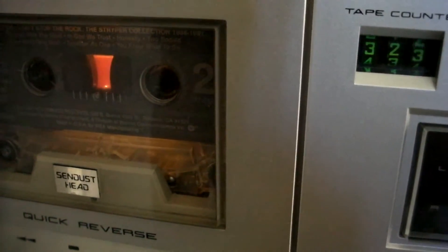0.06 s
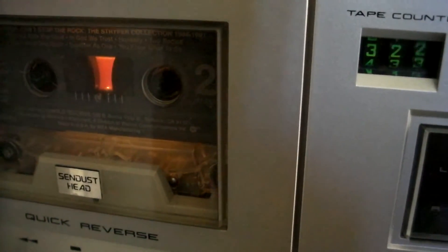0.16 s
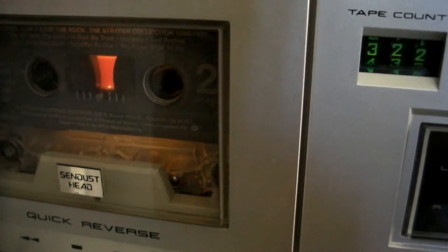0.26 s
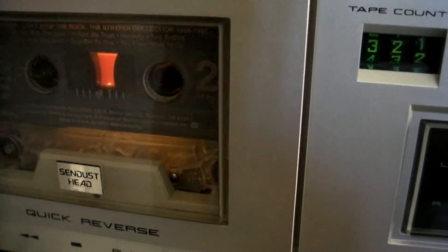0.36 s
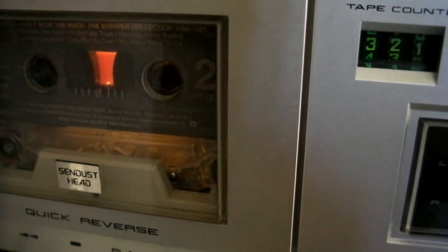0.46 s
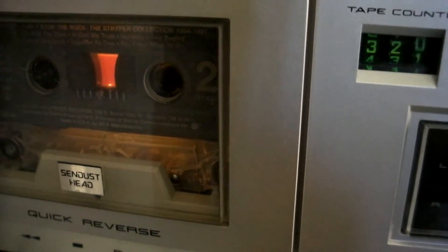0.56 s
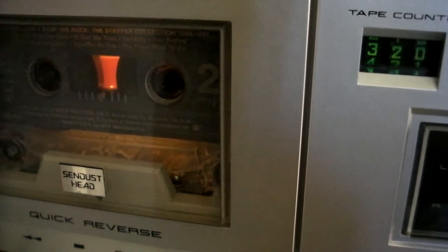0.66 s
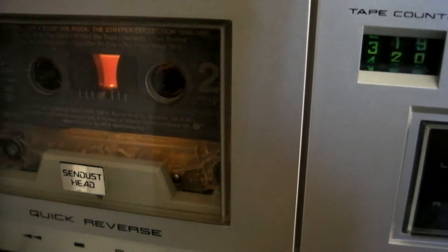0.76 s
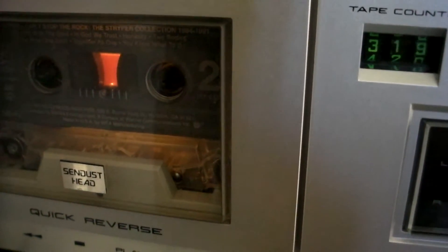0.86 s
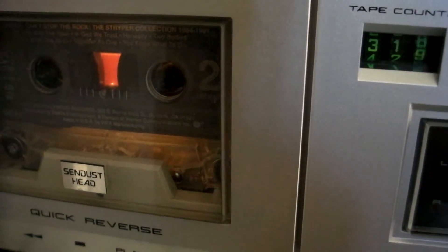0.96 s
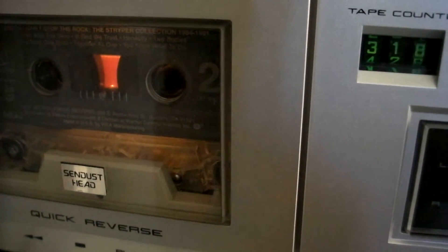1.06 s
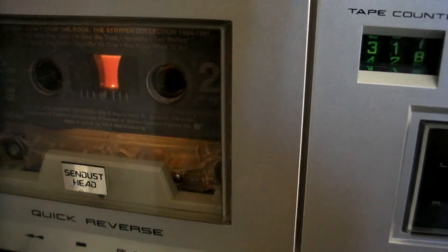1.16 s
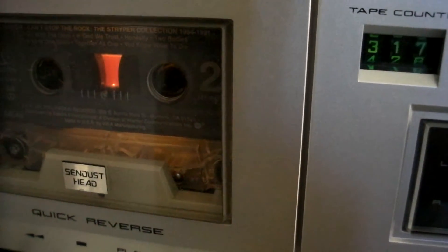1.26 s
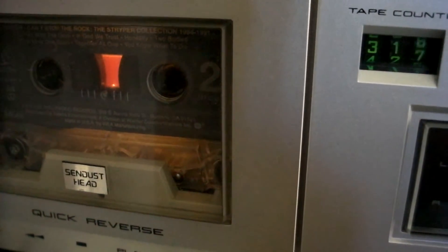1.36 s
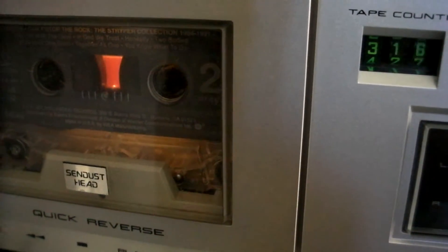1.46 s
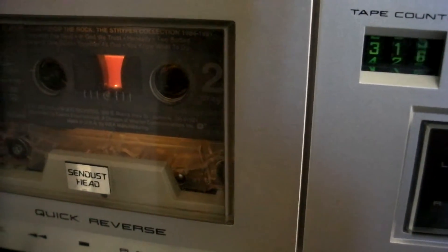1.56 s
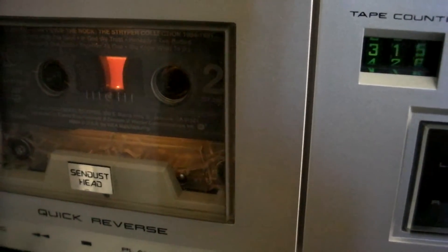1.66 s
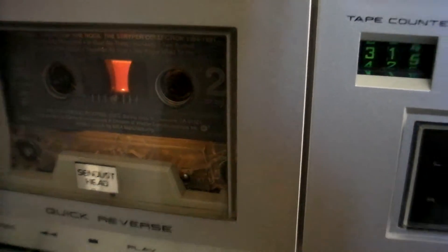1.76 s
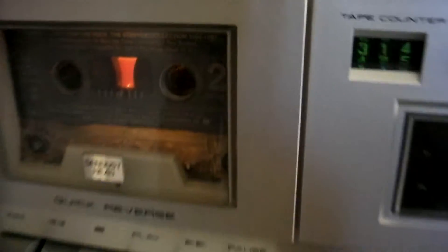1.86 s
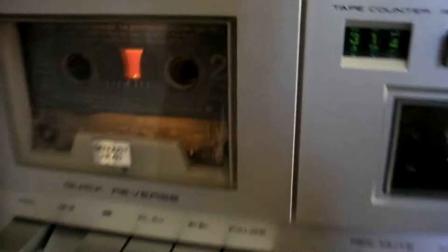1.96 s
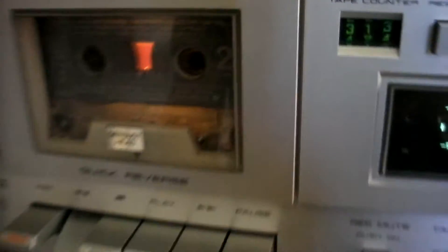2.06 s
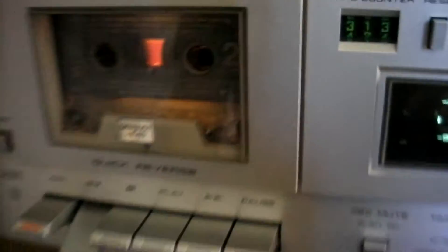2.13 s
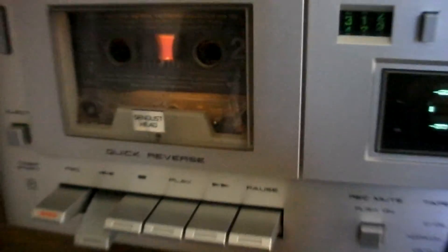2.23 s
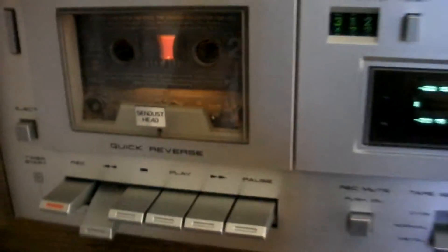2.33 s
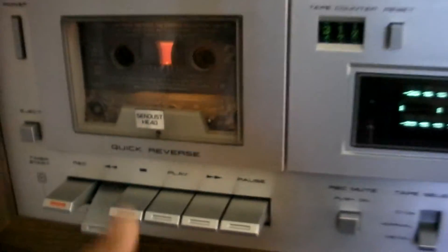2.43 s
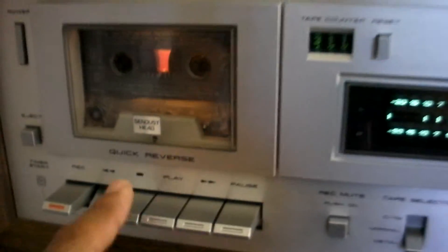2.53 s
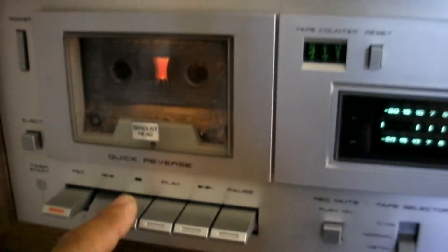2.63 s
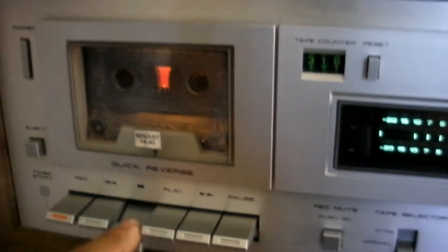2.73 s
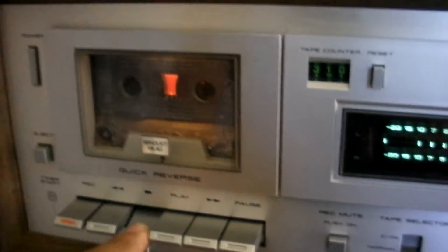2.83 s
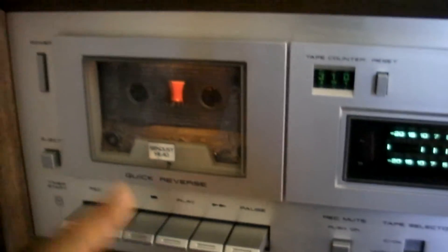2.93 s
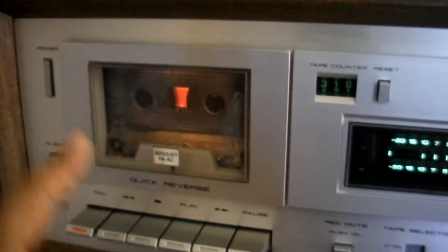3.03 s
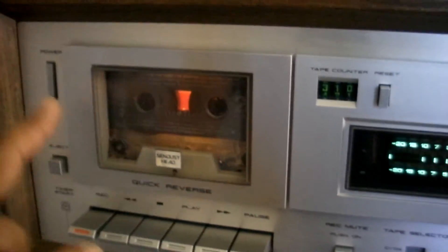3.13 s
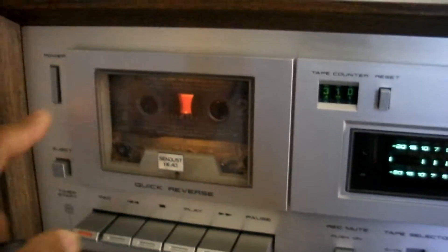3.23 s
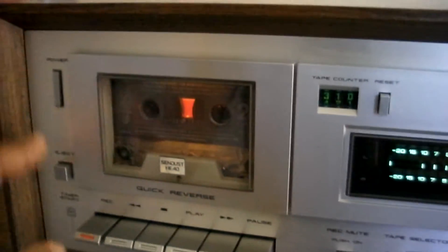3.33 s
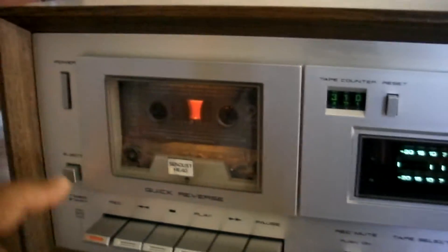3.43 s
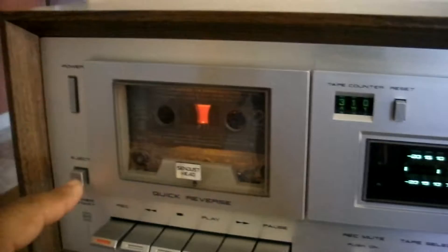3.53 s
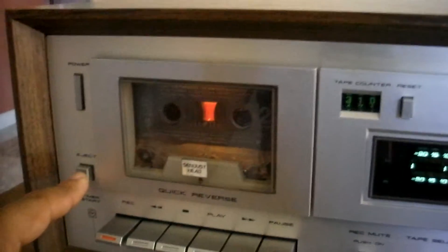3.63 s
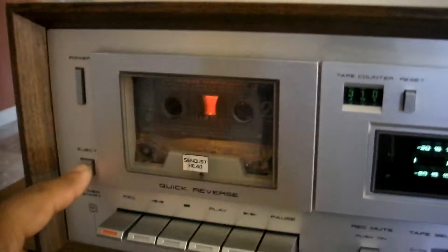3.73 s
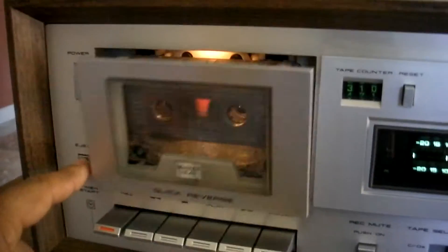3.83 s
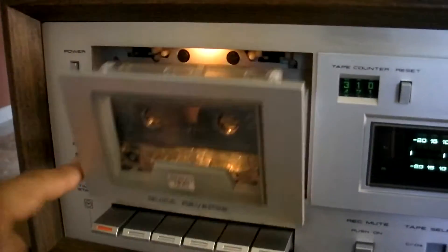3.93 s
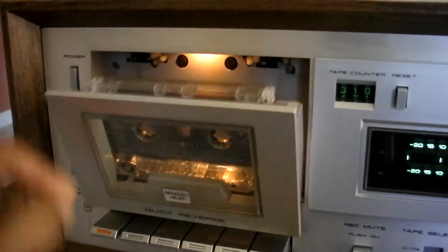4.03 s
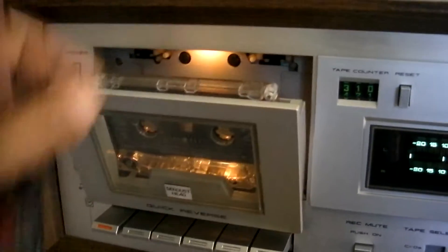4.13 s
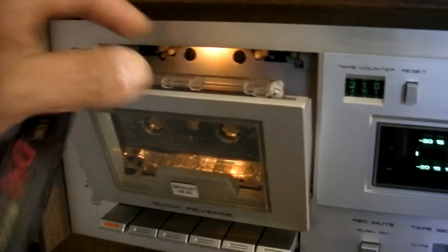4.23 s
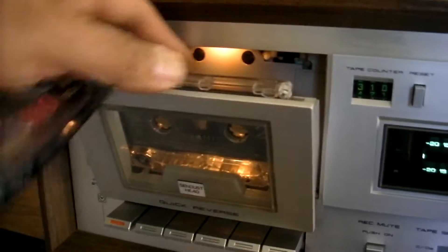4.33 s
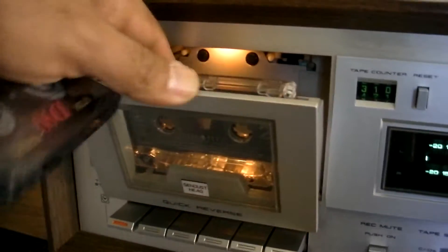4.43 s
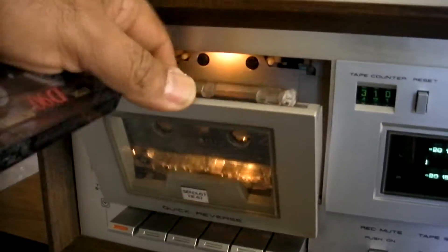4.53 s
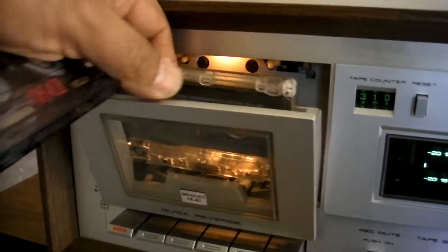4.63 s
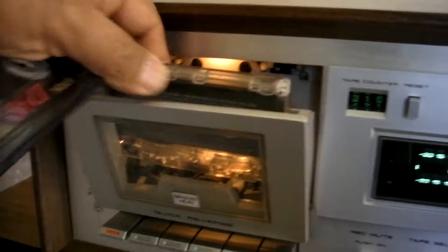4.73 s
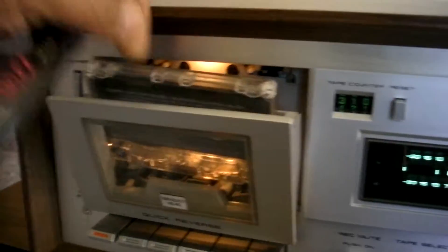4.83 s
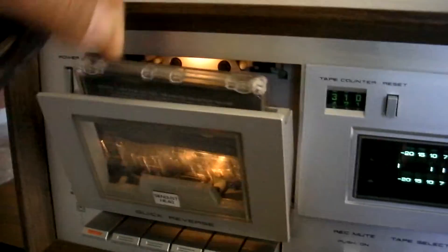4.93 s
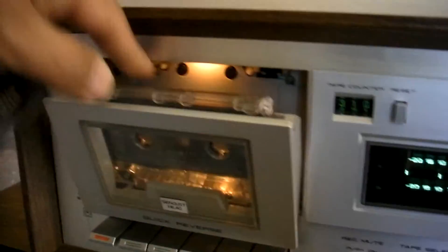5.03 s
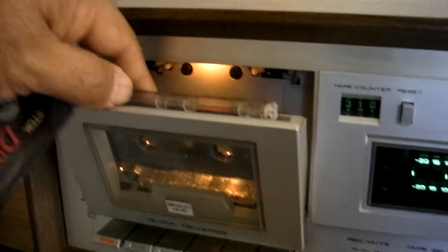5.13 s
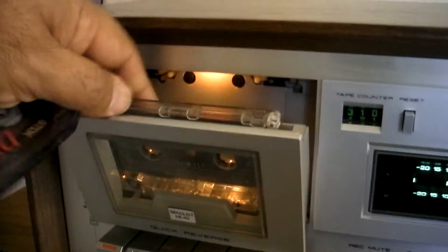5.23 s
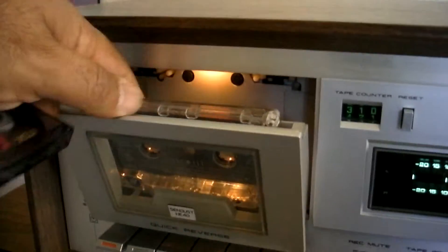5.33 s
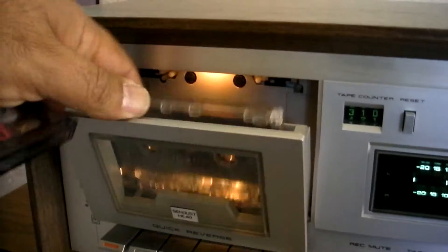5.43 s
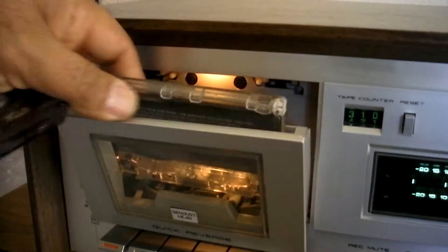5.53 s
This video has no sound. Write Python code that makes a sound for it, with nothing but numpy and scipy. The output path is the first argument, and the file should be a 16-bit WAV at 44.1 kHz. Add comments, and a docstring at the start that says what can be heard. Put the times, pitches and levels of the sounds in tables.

```python
"""Cassette deck: wind, stop, eject

A deck winds tape: the motor is a wavering sine, whir and hiss are coloured noise; one reel squeaks,
the other brushes once a turn. The stop key snaps the transport back and the chassis rings as decaying modes.
The door swings open with a sinking drone; fingers rattle and slide the plastic cassette out of its holder:
each knock and slide is rough noise under a force envelope, ringing the deck. A small, quiet room answers."""
import sys
import numpy as np
from scipy import signal
from scipy.fft import rfft, irfft
from scipy.io import wavfile
from scipy.ndimage import uniform_filter1d

SR = 44100
rng = np.random.default_rng(int(sys.argv[2]) if len(sys.argv) > 2 else 0)


def materialize(psi):
    """Save the field psi as 16-bit PCM at rate SR to the path in sys.argv[1].

    A 1-D psi becomes a single channel; in a 2-D psi each row is a channel.
    """
    bounded = np.clip(np.atleast_2d(psi).T, -1, 1)
    quanta = np.round(bounded * 32767).astype(np.int16)
    wavfile.write(sys.argv[1], SR, quanta)


N = 246519
TIME = np.arange(N) / SR


def undb(db):
    """Decibels to gain."""
    return 10 ** (np.asarray(db) / 20)


def unit(x):
    """Scale to an rms of 1."""
    return x / np.sqrt(np.mean(x ** 2) + 1e-20)


def curves(table):
    """The columns of a timed table, one value per sample."""
    s, *columns = np.transpose(table)
    return [np.interp(TIME, s, column) for column in columns]


def add(out, start_s, x):
    """Mix x into out at start_s."""
    i = max(int(start_s * SR), 0)
    out[:, i:i + x.shape[1]] += x[:, :max(N - i, 0)]


def fade(t, t60_s):
    """Exponential decay: 60 dB in t60_s, full level before t = 0."""
    return np.exp(-np.log(1000) * np.maximum(t, 0) / t60_s)


def walk(rate_hz, size=N):
    """Smooth random drift with a spread of 1."""
    hold = max(int(SR / rate_hz), 1)
    steps = np.repeat(rng.standard_normal(size // hold + 2), hold)
    return unit(uniform_filter1d(steps, hold))[:size]


def band(x, lo_hz, hi_hz):
    """Causal band-pass."""
    return signal.sosfilt(signal.butter(3, [lo_hz, hi_hz], "band", fs=SR, output="sos"), x)


def resonate(x, modes):
    """Parallel resonances: centre_hz, width_hz, level_db."""
    return sum(undb(db) * signal.lfilter(*signal.iirpeak(hz, hz / width_hz, SR), x)
               for hz, width_hz, db in modes)


# difference of the two microphone ports in diffuse sound: freq_hz, side_to_mid_db
WIDTH = [(30, -5), (80, -8), (180, -12), (350, -5), (1000, -8), (2200, -5), (4500, -1.5), (9000, -0.5),
         (15000, -3)]


def noise(spectrum, size=N):
    """Stereo noise of a given colour; the two sides differ most in the treble."""
    log_f = np.log(np.maximum(np.fft.rfftfreq(size, 1 / SR), 1))
    colour_db, side_db = (np.interp(log_f, np.log(hz), db)
                          for hz, db in map(np.transpose, (spectrum, WIDTH)))
    mid, side = rfft(rng.standard_normal((2, size))) * undb(colour_db)
    side = side * undb(side_db)
    return unit(irfft([mid + side, mid - side], size))


# room tone colour: freq_hz, density_db (per Hz)
ROOM_TONE = [(26, -10.5), (45, -19.5), (120, -20.5), (153, -19), (186, 0), (215, -15), (377, -9),
             (448, -12.5), (558, -14), (805, -12.5), (1000, -12), (1850, -16.5), (6430, -23), (7450, -18.5),
             (14400, -30), (15500, -47)]


def room_tone(tone_db=-53, drift_db=0.97, hum_hz=188, hum_db=-66):
    """Steady hiss with a soft low drone and a faint hum."""
    tone = undb(tone_db + drift_db * walk(13)) * noise(ROOM_TONE)
    return tone + undb(hum_db) * np.sin(2 * np.pi * hum_hz * TIME)


def room(x, t60_s=0.25, wet_db=-17):
    """Weak, dull reflections of a small furnished room: convolution with decaying noise."""
    t = np.arange(SR // 2) / SR
    colour = [(80, -13), (180, -10), (600, 12.5), (2000, 0.5), (6000, 0.5), (15000, -1.0)]
    tail = noise(colour, size=len(t)) * fade(t, t60_s) * (t > .005)
    tail = tail / np.sqrt(np.sum(tail ** 2) / 2)
    return undb(wet_db) * signal.fftconvolve(x, tail, axes=1)[:, :N]


# motor speeds up briefly, then settles: time_s, whine_hz (before drag and waver)
MOTOR = [(0, 1790), (.3, 1870), (.57, 1910), (.8, 1790), (2.8, 1800)]
CRUISE_HZ = 1800  # whine at cruising speed


def reel_turns(reel):
    """Turns made by a reel that the motor drives; its rate drifts as tape moves across."""
    start_turns, turns_per_s, gain_per_s = reel
    rate = curves(MOTOR)[0] / CRUISE_HZ * (turns_per_s + gain_per_s * TIME)
    return start_turns + np.cumsum(rate) / SR


# slow reel, also played by brush(): start_turns, turns_per_s (cruising), gain_turns_per_s2
SLOW_REEL = (-.05, 6.64, -.03)
# whine level: time_s, level_db (before gain_db)
WHINE = [(0, -60), (.7, -63), (.95, -56), (1.35, -59), (1.8, -54), (2.5, -62.5), (2.75, -77)]


def motor(gain_db=-1, drag_hz=23, lead_turns=0.21, waver_hz=6, flutter_db=2.0):
    """A thin whine that sags and recovers with each turn of the slow reel."""
    drag = drag_hz * np.cos(2 * np.pi * (reel_turns(SLOW_REEL) + lead_turns))
    hz = curves(MOTOR)[0] + drag + waver_hz * walk(40.1)
    level_db = curves(WHINE)[0] + gain_db + flutter_db * walk(34.45)
    return undb(level_db) * np.sqrt(2) * np.sin(2 * np.pi * np.cumsum(hz) / SR)


def brush(db=-52, fall_db_per_s=0.69, before_turns=0.051, after_turns=0.12, grain_db=4):
    """The slow reel's tape pack scuffs the shell once a turn, less as the winding goes on."""
    angle = (reel_turns(SLOW_REEL) + .5) % 1 - .5
    grains = rng.standard_normal(N) * undb(grain_db * walk(900))
    rub = unit(band(resonate(grains, [(4120, 150, -0.5), (1960, 350, -3.0), (1250, 140, -10)]), 570, 11000))
    touch = np.exp(-.5 * (angle / np.where(angle < 0, before_turns, after_turns)) ** 2)
    return undb(db - fall_db_per_s * TIME + 2 * walk(3.3)) * touch * rub


# fast reel: start_turns, turns_per_s (cruising), gain_turns_per_s2
FAST_REEL = (-.27, 14.14, .22)
# squeak peaks: time_s, peak_db (before gain_db)
SQUEAK = [(0, -39), (.8, -38.5), (1.9, -39.5), (2.2, -41), (2.5, -46), (2.8, -44.5)]


def squeak(hz=3482, flat_hz=200, onset_turns=0.048, release_turns=0.1, slide_turns=.14, gain_db=2):
    """A dry spot on the fast reel sings once a turn, sliding up to its pitch as it grips."""
    turns, (db,) = reel_turns(FAST_REEL), curves(SQUEAK)
    angle = (turns + .012 * walk(25) + .52) % 1 - .5
    grip = np.exp(-.5 * (angle / np.where(angle < 0, onset_turns, release_turns)) ** 2)
    pitch_hz = hz - flat_hz * np.clip(-angle / slide_turns, 0, 1) + 8 * walk(200)
    return undb(db + walk(150) + gain_db) * grip * np.sin(2 * np.pi * np.cumsum(pitch_hz) / SR)


# running tape, before the gains of winding(): time_s, whir_db, hiss_db
TAPE = [(0, -51.5, -52.5), (1.74, -51.5, -51.5), (2.17, -54, -55), (2.53, -55.5, -58), (2.76, -49, -56.5)]
# whir colour: freq_hz, density_db (per Hz)
WHIR = [(150, -43), (250, -13.5), (517, -18), (680, 1), (885, -16), (1010, -21), (1210, 1), (1390, -9.5),
        (1650, -6), (1770, 3.5), (1970, -18.5), (2700, -12), (3100, -3.5), (4030, -33), (6820, -120)]
# hiss colour: freq_hz, density_db (per Hz)
HISS = [(1760, -47), (3000, -12), (3240, -31), (3470, -12), (3590, -2.5), (3840, -9.5), (7740, -9),
        (10800, -6.5), (14200, -15), (14900, -26), (15500, -55)]
# resonances of the running transport: centre_hz, width_hz, level_db
TRANSPORT = [(700, 35, -1), (779, 21, 6.5), (1250, 86, -8.5), (1542, 41, 0.5), (2170, 140, -5),
             (3230, 450, -1)]
STOP_S = 2.83


def winding(whir_db=-3.5, hiss_db=0, transport_db=-5, chatter_db=5, squeak_pan_db=3):
    """Motor whine, tape whir and the two reels, all ended by the stop key."""
    whir_level_db, hiss_level_db = curves(TAPE)
    # gear and bearing chatter rings the transport
    grains = rng.standard_normal(N) * undb(chatter_db * walk(400))
    chatter = unit(band(resonate(grains, TRANSPORT), 460, 4900))
    whir = undb(whir_db) * noise(WHIR) + undb(transport_db) * chatter
    tape = undb(whir_level_db + walk(40.35)) * whir
    tape = tape + undb(hiss_level_db + hiss_db + walk(90)) * noise(HISS)
    reel = squeak() * undb(np.array([[1], [-1]]) * squeak_pan_db / 2)
    return (motor() + tape + brush() + reel) * fade(TIME - STOP_S, .1)


def door_drone(start_s=3.755, open_s=3.845, start_hz=200, end_hz=168, db=-37, t60_s=0.29):
    """The swinging door drones, sinking in pitch as it slows to its stop."""
    swell = np.clip((TIME - start_s) / (open_s - start_s) * 2, 0, 1) * fade(TIME - open_s, t60_s)
    hz = np.interp(TIME, [start_s, open_s], [start_hz, end_hz]) * (1 + 0.01 * walk(40))
    return undb(db) * swell * np.sin(2 * np.pi * np.cumsum(hz) / SR)


# modes of the steel chassis and its springs: freq_hz, level_db, t60_s
CHASSIS = [(178.5, -6, 0.26), (246, -12.5, 1), (381, -13.5, 1), (660, -10, 0.26), (792, -5, 0.5),
           (1102, -12, 0.89), (1266, -16, 0.87), (1665, -14, 0.64), (2130, -4, 0.36), (2610, 1, 0.26),
           (3170, -14, .43), (6140, -21, 0.51)]
# spring buzz colour: freq_hz, density_db (per Hz)
SPRING_BUZZ = [(76, -52), (130, -18), (245, -5), (365, -14.5), (492, -8), (663, 0.5), (732, -11),
               (1230, -3.5), (1330, -8), (2180, -6), (3600, -14.5), (6510, -18.5), (12800, -32),
               (15000, -52)]
# blows that shake the whole deck: start_s, ring_db (before modes_db, buzz_db), thump_db
JOLTS = [(2.805, -32, -60), (2.827, -30, -40.5), (2.991, -43, -72), (3.858, -39.5, -39),
         (5.074, -34.5, -42.5)]


def chassis(modes_db=-4.5, buzz_db=0.5, buzz_t60_s=0.64, thump_t60_s=0.097):
    """Hard blows leave the steel frame ringing and its springs buzzing, and thump the shelf."""
    out, t = np.zeros((2, N)), np.arange(SR) / SR
    for start_s, ring_db, thump_db in JOLTS:
        phases = rng.uniform(0, 2 * np.pi, len(CHASSIS))
        ring = sum(undb(db) * np.sin(2 * np.pi * hz * t + phase) * fade(t, t60_s)
                   for (hz, db, t60_s), phase in zip(CHASSIS, phases))
        buzz = noise(SPRING_BUZZ, size=SR) * fade(t, buzz_t60_s)
        frame = undb(modes_db) * ring + undb(buzz_db) * buzz
        # the ring takes a moment to spread through the frame
        add(out, start_s, undb(ring_db) * frame * (1 - fade(t, 0.027)))
        thump = noise([(15, -9), (40, 2), (110, 5), (200, -9), (600, -63)], size=SR)
        add(out, start_s, undb(thump_db) * thump * fade(t, thump_t60_s) * (1 - fade(t, 0.011)))
    return out


def fingertip(start_s=4.372, lift_s=4.402, db=-37, t60_s=0.026):
    """A fingertip skids on the cassette's edge with a narrow rasp."""
    modes = [(2570, 120, -1), (2930, 130, 4), (3120, 130, -10), (4000, 190, -1)]
    rasp = unit(band(resonate(rng.standard_normal(N), modes), 2100, 4500))
    return undb(db) * rasp * (TIME > start_s) * fade(TIME - lift_s, t60_s)


# resonances of door, cassette shell and front panel: centre_hz, width_hz, level_db
PLASTIC = [(748, 43, -4), (1142, 95, -0.5), (1625, 120, -4.5), (2030, 270, -8), (2424, 53, -6.5),
           (3440, 1000, -14), (3590, 26, -8.5), (4040, 130, -11.5), (4350, 58, -11), (5000, 110, -15),
           (6100, 42, -13), (7000, 22, -32), (7280, 250, -15), (8070, 210, -8.5), (8510, 350, -13),
           (9030, 230, -14), (9300, 57, -23), (9700, 530, -16.5), (10900, 83, -11)]
# resonances of the wooden cabinet: centre_hz, width_hz, level_db
CABINET = [(195.7, 16, 4), (244, 43, 3.5), (309, 122, 2), (446, 55, -5)]


def deck_body(direct_db):
    """Impulse response of the deck's front: the bare click plus plastic and cabinet resonances."""
    click = signal.unit_impulse(SR // 6)
    return undb(direct_db) * band(click, 357, 11300) + resonate(click, PLASTIC) + resonate(click, CABINET)


def spot(body, lo_hz=1500, hi_hz=13000, width_hz=110, boost_db=3, count=12):
    """Every spot that is struck brings out a few resonances of its own."""
    return body + resonate(body, [(hz, width_hz, boost_db) for hz in rng.uniform(lo_hz, hi_hz, count)])


# thud, knock, clack, edge and sizzle bands: low_hz, high_hz
BANDS = [(130, 600), (600, 1400), (1400, 3000), (3000, 7000), (7000, 15500)]
# stereo image of each band: side_to_mid_db, left_minus_right_db
SPREAD = [(-14.5, -0.5), (-20, -0.4), (-13, -0.5), (-8.5, -1.5), (-1.5, -3.5)]


def contact(force, body, colour_db, grain_db, ring_hz, ring_db, ring_width_hz):
    """Rough contact under a force envelope rings the body and the touched part; energy 1."""
    grain = undb(grain_db * walk(2500, size=len(force)))
    rough = rng.standard_normal((2, len(force))) * grain * force
    sound = signal.fftconvolve(rough, body[None], axes=1)
    force = np.pad(force, (0, len(body) - 1))
    out = 0
    for (lo_hz, hi_hz), (side_db, pan_db), db in zip(BANDS, SPREAD, colour_db):
        mid, side = (unit(v) for v in band(sound, lo_hz, hi_hz))
        side = side * undb(side_db)
        out = out + undb(db) * unit(np.array([(mid + side) * undb(pan_db), mid - side]))
    # higher rings die sooner; ring_width_hz holds at 1 kHz
    width_hz = ring_width_hz * np.sqrt(ring_hz / 1000)
    ring = resonate(rng.standard_normal(len(force)) * force, [(ring_hz, width_hz, 0)])
    out = unit(out) + undb(ring_db) * unit(ring)
    return out / np.sqrt(np.sum(out ** 2))


# what can slide, by name; colours relative to the clack band:
# thud_db, knock_db, edge_db, sizzle_db, ring_hz, ring_db, grip_s, release_t60_s
SURFACES = {"tape": (-14, -7, 1, -7, 2950, -1, .06, .25), "hinge": (-9, 3, -6, -15, 1083, -8, .005, .05),
            "skin": (-9, -5.5, 6.5, 3, 3200, -5, .001, .08),
            "shell": (-5, 1, 0, -3, 1169, -9.5, .003, .045),
            "rim": (-0.5, 0, 4.5, 5.5, 4160, -17, .006, .05)}
# slides: start_s, end_s, level_db, surface
SLIDES = [(.45, .61, -45, "tape"), (3.765, 3.841, -35, "hinge"), (3.88, 3.933, -34.5, "shell"),
          (4.041, 4.05, -40, "shell"), (4.371, 4.409, -33, "skin"), (4.59, 4.718, -36, "shell"),
          (4.74, 4.859, -40, "shell"), (4.86, 4.937, -37, "shell"), (4.96, 5.01, -48, "hinge"),
          (5.1, 5.172, -30, "shell"), (5.175, 5.245, -35, "shell"), (5.322, 5.417, -43, "rim"),
          (5.44, 5.496, -52, "hinge"), (5.52, 5.593, -37.5, "shell")]


def slides(catch_db=3.0, ring_width_hz=110):
    """Sliding surfaces catch and slip unevenly, then ease off."""
    out, body = np.zeros((2, N)), deck_body(direct_db=-13)
    for start_s, end_s, db, surface in SLIDES:
        thud, knock, edge, sizzle, ring_hz, ring_db, grip_s, release_t60_s = SURFACES[surface]
        length_s = max(end_s - start_s, grip_s)
        t = np.arange(int((length_s + release_t60_s) * SR)) / SR
        catch = undb(catch_db * walk(159.6, size=len(t)))
        force = np.minimum(t / grip_s, 1) * fade(t - length_s, release_t60_s) * catch
        rub = contact(force, body, [thud, knock, 0, edge, sizzle], 3.3, ring_hz, ring_db, ring_width_hz)
        add(out, start_s, undb(db) * np.sqrt(length_s * SR) * rub)
    return out


# what can be struck, by name; colours relative to the clack band; a rebound_after_s past the force window is silent:
# thud_db, knock_db, edge_db, sizzle_db, ring_db, graze_db, rebound_after_s, rebound_db
PARTS = {"lever": (-29.5, -5, 5.5, 5.5, -9, -43, 0.8, -13.5),
         "button": (-26, -11, -5, -24, -4, -35, .016, -10), "door": (-21, 3, -6, -14, -2.5, -27, .009, -4),
         "holder": (-21.5, -5.5, -3, -12.5, -7, -15.5, .016, -12),
         "shell": (-16, -2, -1.5, -3, -4, -21.5, 0.3, -12),
         "catch": (-13, -3.5, 5, 4.5, -7.5, -22, 0.8, -13)}
# knocks of stop key, transport, eject button, door and cassette, which drops back once and is lifted again:
# start_s, rise_s, t60_s (before shorten), level_db (over 10 ms, before gain_db), bright_db, ring_hz, part
KNOCKS = [ (2.435, 0.00055, .02, -28.5, -2.5, 3630, "button"),
          (2.79, 0.00034, 0.043, -22, -1, 3680, "lever"), (2.804, 0.00037, 0.023, -16.5, 1, 5320, "lever"),
          (2.824, 0.0085, 0.042, -9.5, 1, 2290, "lever"), (2.989, 0.0014, 0.025, -21.5, 2.5, 5810, "lever"),
          (3.38, 0.00083, 0.042, -49.5, 0, 1130, "door"), (3.514, .0009, 0.03, -49, -5, 970, "shell"),
          (3.657, 0.00068, 0.056, -36.5, -3, 3880, "holder"), (3.752, .0006, 0.036, -23, -4, 1040, "door"),
          (3.786, 0.0047, 0.042, -34.5, -1, 1000, "door"), (3.837, .0005, .04, -28.5, 0, 2150, "holder"),
          (3.844, 0.00036, .05, -18, -3, 1150, "shell"), (3.852, 0.0043, 0.045, -16.5, -12, 1590, "shell"),
          (3.862, 0.00077, 0.056, -21.5, 6, 1125, "holder"),
          (3.872, 0.00073, 0.058, -18.5, 3, 1140, "catch"),
          (3.902, 0.0011, 0.031, -27.5, -3, 1124, "shell"), (3.914, 0.00045, .07, -28, -2, 3600, "catch"),
          (4.06, 0.0033, 0.063, -18.5, 3.5, 920, "holder"),
          (4.139, .0022, 0.042, -26.5, 1.5, 2180, "holder"),
          (4.155, 0.0044, 0.052, -22.5, -5, 1560, "shell"),
          (4.199, 0.0027, 0.016, -29.5, 3.5, 4100, "shell"),
          (4.238, 0.00077, 0.036, -43, -4, 4200, "shell"), (4.487, 0.0039, 0.2, -34.5, 1.5, 1200, "shell"),
          (4.571, 0.00049, 0.013, -18.5, -8, 2200, "holder"),
          (4.588, 0.0018, 0.054, -26.5, -8, 2160, "shell"), (4.635, 0.00076, 0.045, -25, -6, 1150, "shell"),
          (4.724, 0.00024, .046, -20.5, -3, 10140, "shell"), (4.781, .003, 0.037, -30, -0.5, 1180, "shell"),
          (4.823, .002, 0.031, -29, -1, 2720, "holder"), (4.881, .0026, 0.045, -33.5, 5, 2140, "holder"),
          (5.041, 0.0067, 0.025, -23, 1.5, 5260, "shell"),
          (5.051, 0.0015, 0.03, -19.5, -0.5, 1550, "catch"),
          (5.07, 0.0013, 0.083, -9.5, 7.5, 2130, "holder"), (5.085, 0.0011, 0.039, -8, 2, 1570, "catch"),
          (5.122, .0003, 0.11, -22.5, -2, 1570, "catch"), (5.132, .0008, 0.095, -18.5, -0.5, 9840, "catch"),
          (5.22, 0.0018, 0.064, -24, -8.5, 1090, "shell"), (5.294, .001, 0.11, -38.5, -12, 2140, "holder"),
          (5.417, 0.0014, 0.044, -22.5, 6, 1127, "door"), (5.472, 0.00092, 0.022, -28, 0, 2140, "holder"),
          (5.502, .0007, .05, -34.5, -8, 2340, "holder"), (5.525, 0.0034, 0.07, -32.5, -3, 757, "shell"),
          (5.566, .0009, 0.042, -29.5, -3, 1570, "shell"), (5.581, 0.0031, 0.029, -26.5, -1, 6020, "shell")]


def knocks(gain_db=1, shorten=0.95, graze_s=.009, rebound_t60_s=0.049, rattle_db=-17, rattle_t60_s=0.08,
           ring_width_hz=60):
    """Parts graze, meet and fade fast; button, door and holder rebound once; loose plastic rattles on."""
    out, body = np.zeros((2, N)), deck_body(direct_db=-10.5)
    t = np.arange(SR // 6) / SR - graze_s  # force window
    for start_s, rise_s, t60_s, db, bright_db, ring_hz, part in KNOCKS:
        thud, knock, edge, sizzle, ring_db, graze_db, rebound_s, rebound_db = PARTS[part]
        meet = np.clip((t + 1 / SR) / max(rise_s, 1 / SR), 0, 1)
        graze = 1. * (t < 0)
        hit = meet * fade(t - rise_s, shorten * t60_s)
        # all zero for lever, shell and catch
        rebound = (t > rise_s + rebound_s) * fade(t - rise_s - rebound_s, rebound_t60_s)
        rattle = meet * fade(t, rattle_t60_s)
        stages = [(graze_db, graze), (0, hit), (rebound_db, rebound), (rattle_db, rattle)]
        force = np.sqrt(sum((undb(stage_db) * unit(shape)) ** 2 for stage_db, shape in stages))
        colour_db = [thud, knock, 0, edge + bright_db / 2, sizzle + bright_db]
        blow = contact(force, spot(body), colour_db, 2.03, ring_hz, ring_db, ring_width_hz)
        add(out, start_s - graze_s, undb(db + gain_db) * np.sqrt(SR / 100) * blow)
    return out


def scene():
    """The deck, its room and the background."""
    handling = knocks() + slides() + fingertip() + chassis() + door_drone()
    return handling + room(handling) + winding() + room_tone()


def record(dry, notch_hz=7930, notch_width_hz=350, top_hz=15600, offset=.0027):
    """Microphone with a narrow treble dip, rounded peaks, a cut top and a converter slightly off zero."""
    x = signal.lfilter(*signal.iirnotch(notch_hz, notch_hz / notch_width_hz, SR), dry)
    low_pass = signal.ellip(8, .2, 70, top_hz, fs=SR, output="sos")
    return signal.sosfilt(low_pass, np.tanh(x)) + offset


dry = scene()
out = record(dry)
materialize(out)
```